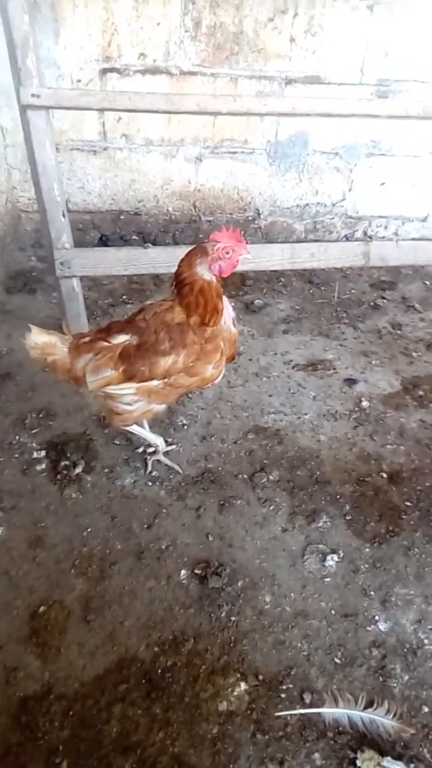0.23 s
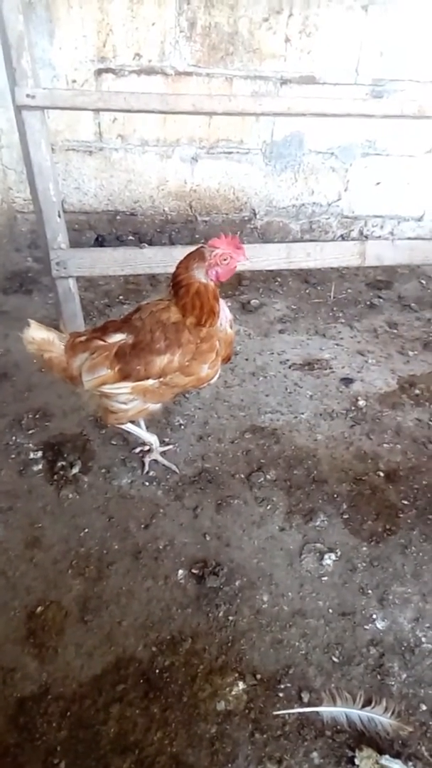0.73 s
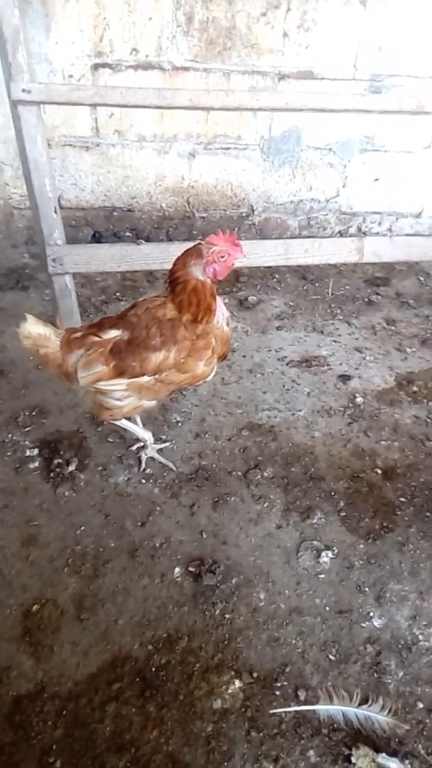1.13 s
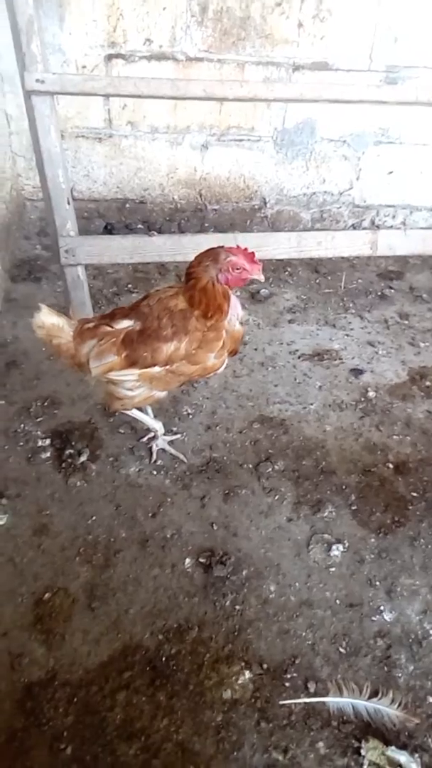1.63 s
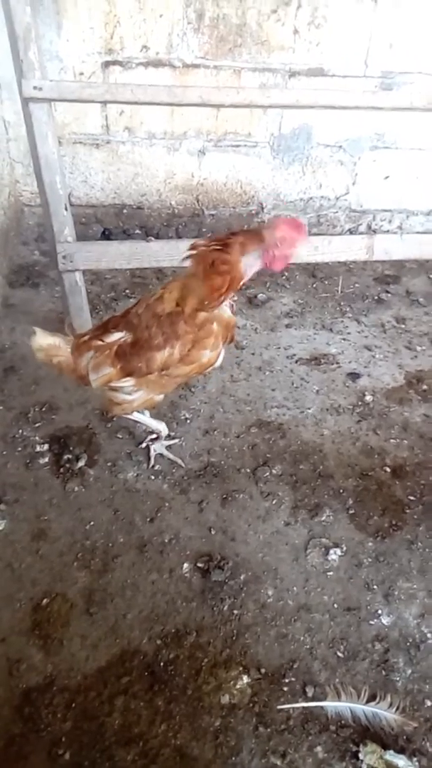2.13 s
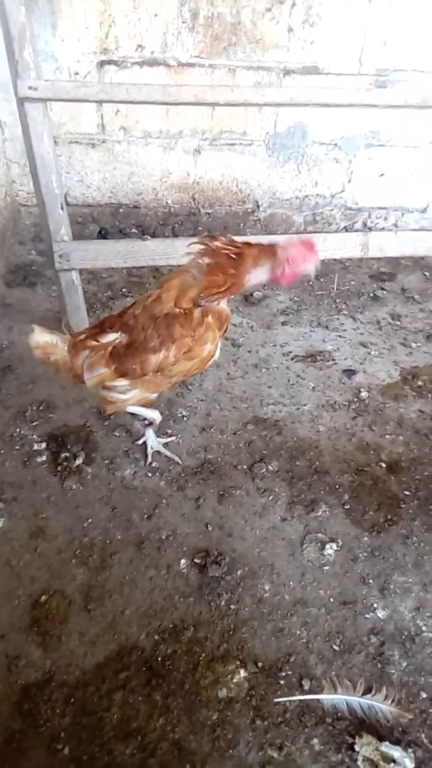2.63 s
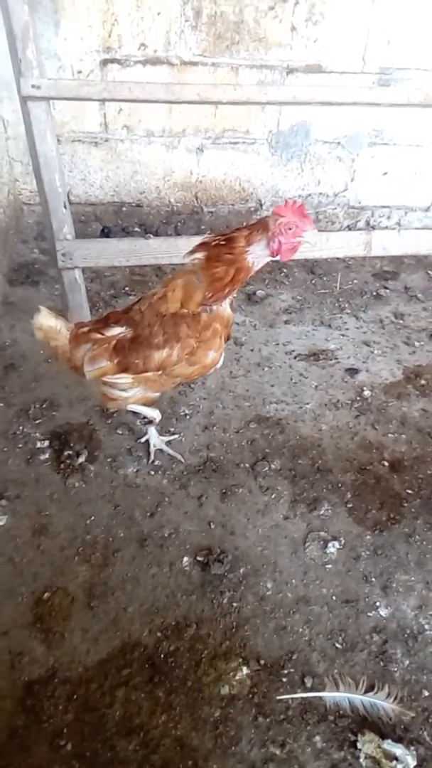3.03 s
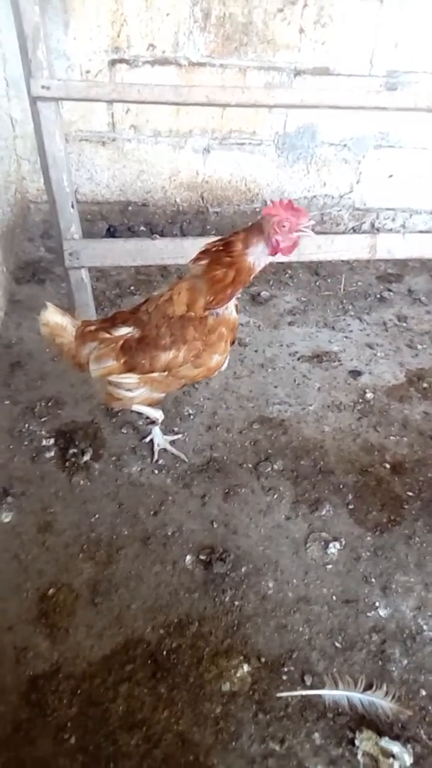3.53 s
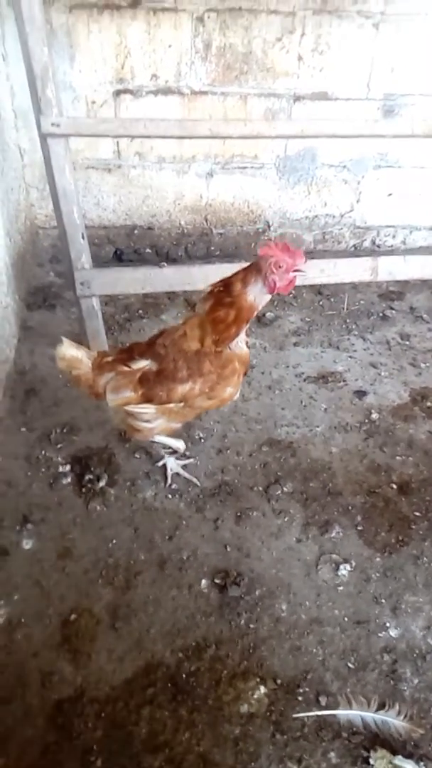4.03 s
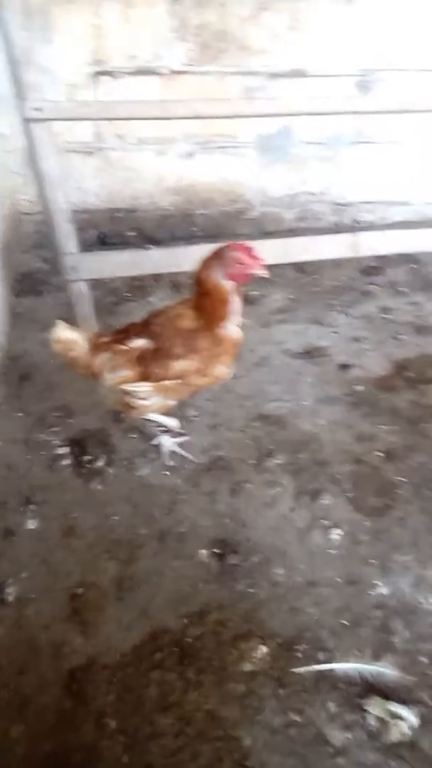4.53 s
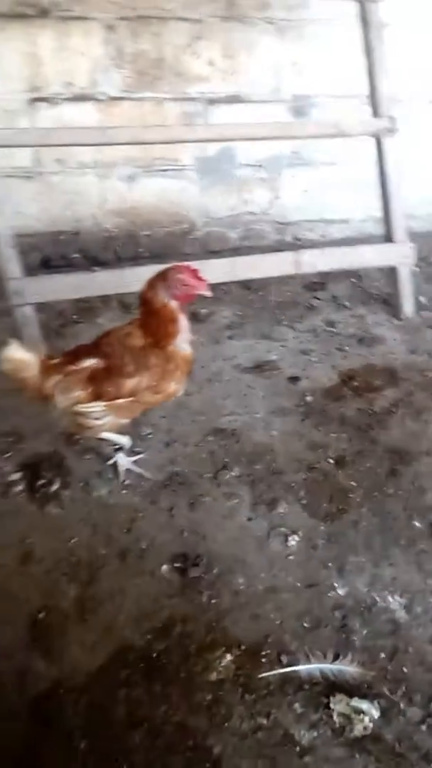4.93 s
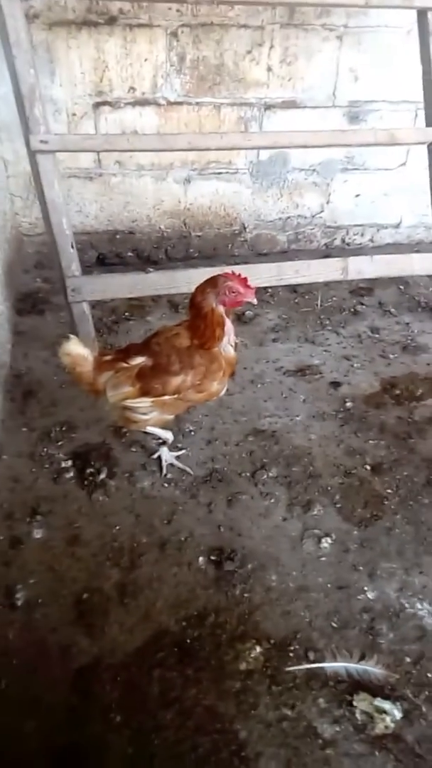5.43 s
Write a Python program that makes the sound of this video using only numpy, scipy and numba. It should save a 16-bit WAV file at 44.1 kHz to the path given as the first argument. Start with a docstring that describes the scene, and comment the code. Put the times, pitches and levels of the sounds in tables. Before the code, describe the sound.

One hen near the microphone gives a single harsh squawk, just under a second long, its pitch cracking up and down. Before it, hens further back cluck and moan quietly; after it come scattered pecks and scrapes, then another climbing moan and a couple of clucks. A low hum, airy hiss and faint twittering sparrows fill the small, slightly echoing pen throughout.

```python
"""A walled hen pen opens on hum, air hiss and sparrows twittering outside; feet and beaks tap throughout.
Further off the flock clucks, and a long throaty moan rises from 1 s. At 1.8 s a near hen stretches her
neck and gives one harsh squawk: her voice membranes break from register to register, rasping as they go,
and the stone walls ring. From 2.7 s the pen is back to taps and murmur, until a second moan climbs
at 4.7 s and two clucks close the scene."""
import sys
import numpy as np
from scipy import signal
from scipy.fft import rfft, irfft, next_fast_len
from scipy.io import wavfile
from scipy.ndimage import uniform_filter1d
from numba import njit

SR = 44100
rng = np.random.default_rng(int(sys.argv[2]) if len(sys.argv) > 2 else 0)


def dump_mix(stems):
    """Bounce the given channels to the path in sys.argv[1] as a 16-bit WAV at rate SR."""
    frames = np.atleast_2d(stems).T  # one column per channel
    limited = np.clip(frames, -1, 1)  # hard clip at full scale
    pcm = np.round(limited * 32767).astype(np.int16)
    wavfile.write(sys.argv[1], SR, pcm)


N = 250488
TIME, FFT_SIZE = np.arange(N) / SR, next_fast_len(N)
TOP_HZ = 15680

# Squawk registers, levels relative to the effort: start/s, end/s, from f/Hz, to f/Hz, glide/s,
# first partial/dB, its swell/dB, second partial/dB, its swell/dB, overtones/dB, tilt/(dB per octave),
# half-pitch partials/dB, rasp/dB, extra rasp at the break/dB, jitter/share of pitch
REGISTERS = [(1.82, 1.894, 858, 1403, .015, 0.5, 6.5, -4, 15, -8, -1, -47, -17.5, 23, 0.0042),
             (1.882, 2.057, 1370, 1227, 0.099, -0.5, -2.5, -13.5, -11, -8, 0.5, -12, -6, -3.5, 0.098),
             (2.014, 2.183, 610, 717.7, .06, -1, 9.5, -8, -14, -6, 4.5, -49, -31, 23, 0.0036),
             (2.17, 2.266, 709, 747, 0.082, -7.5, 17.5, -11.5, -23, -4, 1, -4, -6.5, 4, 0.01),
             (2.253, 2.296, 749, 840, 0.0306, 2.5, -15.5, -19, -1, -18, 13, 8, -3.5, 4.5, 0.012),
             (2.289, 2.394, 976.6, 1017, 0.049, -7, -2, -1, -2, -8.5, 5, -20.5, -7.5, 2, 0.0172),
             (2.381, 2.564, 1100, 1139, 0.034, 2, 2.5, -7, -12.5, -16.5, 6, -6, -4.5, 10.5, 0.0163),
             (2.551, 2.648, 1115, 1141, 0.051, -13, -14, -10.5, -19, -8.5, 0, 6, 0, 0, 0.024)]
# Effort envelope of the squawk: t/s, level/dB
EFFORT = [(1.818, -15), (1.836, -20), (1.844, -20.5), (1.856, -11.5), (1.872, -18), (1.908, -20),
          (1.95, -26), (1.974, -31.5), (2.048, -16.5), (2.246, -19), (2.278, -16), (2.304, -22.5),
          (2.34, -14), (2.404, -18.5), (2.536, -14), (2.574, -21.5), (2.594, -13), (2.64, -25.5)]
# The near hen's open throat, as an EQ on her overtones: f/Hz, gain/dB
OPEN_THROAT = [(290, -13), (500, -19), (694, 10.5), (1610, 7.5), (2020, 1), (2460, -18), (2800, -4.5),
               (3180, -7.5), (3460, -3.5), (5860, -11), (7790, -27), (9120, -26), (15000, -58.5)]
# Resonances rung by chaotic cycles: f/Hz, width/Hz, gain/dB
RASP_MODES = [(919, 254, -11), (1146, 120, -4.5), (1718, 71, -12), (1963, 95, -9.5), (2350, 490, -16),
              (2656, 66, -11), (3797, 250, -13.5), (4573, 323, -14), (5520, 110, -23), (6130, 160, -22),
              (7510, 280, -28.5), (9100, 820, -44.5)]
# The other side of the voice box, humming under the last registers: t/s, f/Hz, level/dB
UNDERTONE = [(2.29, 767, -39), (2.41, 797, -30.5), (2.57, 805, -29.5), (2.615, 639, -29.5),
             (2.66, 603, -28)]
# Two long moans, a list each: t/s, f/Hz, level/dB, brightness/(dB per octave), boost above partial 2/dB
MOANS = [
    [(0.99, 491, -52.5, 8, -8), (1.08, 504.5, -32, 8, -12.5), (1.16, 568.5, -32, -3, -3),
     (1.25, 593.2, -32, -5, -10), (1.4, 605.4, -27, 0, -12), (1.49, 617.4, -31.5, 1, -17),
     (1.57, 638.3, -25.5, 4, -4), (1.66, 623.5, -25.5, 0.5, -4), (1.73, 603.8, -23.5, 2.5, 2),
     (1.83, 607, -29.5, -2, -4), (1.91, 603.4, -26, 11.5, -5), (1.96, 521.6, -28.5, 1, 16),
     (2.04, 510, -27.5, -2.5, 5)],
    [(4.68, 549.3, -50, -1, 11), (4.76, 548.4, -41, 10.5, -19), (4.94, 577.5, -44, 3.5, -18),
     (5.0, 584.6, -34.5, -2.5, -16), (5.07, 651.4, -42.5, -23, 0), (5.17, 728, -30.5, -25, 0),
     (5.23, 834, -31.5, -3, -2), (5.32, 839, -32.5, -4.5, 0), (5.36, 802, -51, 6, 0)],
]
# Short clucks: start/s, length/s, from f/Hz, to f/Hz, level/dB, fade/dB, brightness/(dB per octave),
# boost above partial 2/dB, flutter/share of pitch
CLUCKS = [(0.33, 0.079, 555.6, 562, -36, 15.5, 2.5, 5.5, 0.016),
          (0.869, 0.12, 270.6, 271, -31.5, 6, -8, 16.5, 0.014),
          (1.129, 0.17, 402, 378, -41.5, 5, -0.5, -6, 0.029),
          (1.363, 0.074, 929, 936, -31, 12, -25, 0, 0.045),
          (5.509, .08, 557, 599, -39, 11.5, 7.5, -26, 0.034),
          (5.537, .16, 818.4, 759, -35.5, -1, -9, 11, 0.043)]
# Throat colour of the flock: f/Hz, gain/dB
FLOCK_THROAT = [(270, -24.5), (500, -1.5), (800, -1), (1100, -1.5), (1300, -2.5), (1700, -14.5),
                (2200, -32), (3500, -54)]
# Taps and scrapes of feet and beaks: t/s, level before the crack/dB, f/Hz, width/share of f, t60/s
TAPS = [(0.601, -46.5, 2180, 0.84, 0.2), (0.655, -43.5, 4200, 0.22, 0.11), (1.73, -47.5, 7700, 1, 0.16),
        (3.286, -50.5, 1780, 0.12, 0.83), (3.32, -44, 4230, 0.16, 0.51), (3.62, -41, 5030, 0.095, .16),
        (3.81, -46, 585, .99, 0.36), (4.087, -39, 4520, 0.81, 0.45), (4.49, -47.5, 326, 0.44, 0.23),
        (4.593, -46, 1680, 0.13, 0.3), (4.92, -50.5, 300, .42, 0.82), (5.184, -36, 1860, 0.51, 0.32),
        (5.294, -38, 405, 1, 0.2), (5.44, -53, 2750, 0.12, .078)]
# Path of the twittering band: t/s, centre f/Hz, level/dB
TWITTER = [(0, 5203, -51), (1.5, 5080, -47.5), (3, 5014, -49.5), (3.6, 5000, -48.5), (3.95, 5014, -52.5),
           (4.4, 4760, -45.5), (4.75, 4745, -50), (5.68, 4765, -51)]
# Colour of the hum and hiss: f/Hz, relative level/dB
AIR_COLOUR = [(15, -60), (25, -12), (75, -11.5), (107, 3.5), (160, -6), (399, -9), (433, -14.5), (648, -5),
              (1200, -13.5), (1570, -11), (2920, -10), (5140, -7.5), (6050, -19), (10600, -21.5),
              (15500, -34.5)]
# Steady peaks and dips in the hiss: f/Hz, width/Hz, gain/dB
AIR_BANDS = [(620, 40, 3), (1644, 350, 4.5), (2360, 360, -7.5), (2410, 230, 5), (2690, 65, 5),
             (3760, 220, 3), (6540, 360, 6), (8950, 990, 4), (10600, 580, 6.5)]
# Rustling of the flock, riding the mids of the hiss: t/s, relative level/dB
BUSTLE = [(0, -52), (.5, -56.5), (.85, -52), (3, -56), (3.3, -53.5), (3.85, -57.5), (4.5, -53),
          (5.4, -57.5)]


def squawk(shimmer_db=5.0, hoarse_share=0.87, hoarse_jitter=0.6, hoarse_dulling=0.18):
    """Membrane partials through the open throat; alternating cycles add half lines, chaos adds rasp."""
    out, wobble = np.zeros(N), walk(250)
    chaos = rng.standard_normal(N) * undb(1.5 * walk(400))
    rasp = unit(sum(undb(db) * np.sqrt(width) * unit(ring(chaos, hz, width))
                    for hz, width, db in RASP_MODES))
    shimmer = [undb(shimmer_db * walk(120)) for _ in range(6)]
    order = np.setdiff1d(np.arange(1, 46) / 2, [1, 2])[:, None]  # half steps, without partials 1 and 2
    for (start, end, from_hz, to_hz, glide_s, first_db, swell_db, second_db, swell2_db,
         over_db, tilt, half_db, rasp_db, break_db, shake) in REGISTERS:
        at, gate, (along,) = automation([(start, -.5), (end, .5)], edge_s=.012)
        age = TIME[at] - start
        hz = to_hz + (from_hz - to_hz) * np.exp(-age / glide_s)
        # hoarseness at the break drives rasp, jitter and dullness, then dies away
        hoarse_db = break_db * np.exp(-age / (hoarse_share * glide_s))
        jitter = shake * undb(hoarse_jitter * hoarse_db)
        # the throat holds the two lowest partials steady while the overtones shake
        steady = phase_of(hz * (1 + (0.0024 + 0.2 * jitter) * wobble[at]))
        shaky = phase_of(hz * (1 + jitter * wobble[at]))
        first = undb(first_db + swell_db * along) * np.sin(steady)
        second = undb(second_db + swell2_db * along) * np.sqrt(shimmer[1][at]) * np.sin(2 * steady)
        tilt_db = (tilt - hoarse_dulling * hoarse_db) * np.log2(order)
        gain = undb(eq(OPEN_THROAT, order * hz) + tilt_db + (order % 1 > 0) * half_db)
        gain *= order * hz < TOP_HZ
        gain /= np.sqrt(np.sum(gain ** 2, axis=0))
        overtones = sum(gain[k] * shimmer[k % 6][at] * np.sin(ratio * shaky + k * k)
                        for k, ratio in enumerate(order))
        tone = np.sqrt(2) * (first + second + undb(over_db) * overtones)
        out[at] += gate * (tone + undb(rasp_db + hoarse_db) * rasp[at])
    out *= undb(np.interp(TIME, *np.transpose(EFFORT)))
    at, gate, (hz, db) = automation(UNDERTONE, edge_s=0.011)
    undertone = np.sin(phase_of(hz * (1 + 0.025 * wobble[at])))
    out[at] += np.sqrt(2) * gate * undb(db) * shimmer[0][at] * undertone
    # a small bird radiates no bass
    return signal.sosfilt(signal.butter(4, 430, "high", fs=SR, output="sos"), out)


def flock(throb_hz=38, throb_db=2.5, husk_db=-15, moan_flutter=0.0116):
    """Throaty four-partial calls: pitch flutters, level throbs, uneven cycles add a husky edge."""
    out, order = np.zeros(N), np.arange(1, 5)[:, None]
    throb = 1.03 * walk(60) + np.sin(phase_of(throb_hz * (1 + 0.153 * walk(8))))
    flutter, waver = walk(110), 0.00692 * walk(28)
    husk = np.array([(1 + undb(husk_db) * walk(500)) * undb(1.58 * walk(25)) for _ in order])
    for call, depth in [(moan, moan_flutter) for moan in MOANS] + [cluck(*row) for row in CLUCKS]:
        at, gate, (hz, db, bright, upper_db) = automation(call, edge_s=0.0081)
        phase = phase_of(hz * (1 + depth * flutter[at] + waver[at]))
        gain = undb(eq(FLOCK_THROAT, order * hz) + bright * np.log2(order) + (order > 2) * upper_db)
        gain /= np.sqrt(np.sum(gain ** 2, axis=0))
        tone = np.sum(gain * husk[:, at] * np.sin(order * phase), axis=0)
        out[at] += np.sqrt(2) * gate * undb(db + throb_db * throb[at]) * tone
    return out


def cluck(start, length, hz, to_hz, db, fade_db, bright, upper_db, flutter):
    """Breakpoints and flutter depth of a cluck, which glides straight to its last pitch and level."""
    return [(start, hz, db, bright, upper_db),
            (start + length, to_hz, db - fade_db, bright, upper_db)], flutter


def taps(crack_db=4.5, crack_s=0.0027, pecks_per_s=9):
    """Feet and beaks: dying bursts of band noise that open with a crack; faint pecks fall at random."""
    out, t = np.zeros(N), TIME[:int(.4 * SR)]
    pecks = [(when * N / SR, -56 + 12.5 * size, 1500 * 4.5 ** pitch, .3, .05 + 0.18 * decay)
             for when, size, pitch, decay in rng.random((int(pecks_per_s * N / SR), 4))]
    for start, db, hz, share, t60 in TAPS + pecks:
        burst = unit(ring(rng.standard_normal(len(t)), hz, share * hz))
        envelope = undb(db - 60 * t / t60 + crack_db * np.exp(-t / crack_s))
        place(out, envelope * burst, start)
    return out


def sparrows(chirps_per_s=90, chirp_s=0.016, spread=0.089):
    """Many short falling chirps, blurred by distance and echoes into a twittering band."""
    times, centre_hz, db = np.transpose(TWITTER)
    out, t = np.zeros(N), TIME[:int(.08 * SR)]
    for when, pitch, size, fall in rng.random((int(chirps_per_s * N / SR), 4)):
        start = when * N / SR
        hz = np.interp(start, times, centre_hz) * (1 + spread * (1 - 2.2 * pitch ** 2))
        chirp = np.sin(2 * np.pi * hz * t * (1 - fall * t))
        place(out, undb(12 * size) * chirp * t * np.exp(-t / chirp_s), start)
    chirps = unit(.5 * out + pen_reverb(out))
    blur = unit(ring(rng.standard_normal(N), np.interp(TIME, times, centre_hz), width_hz=910))
    return (undb(-4) * chirps + undb(-5) * blur) * undb(np.interp(TIME, times, db))


def murmur(level_db=-61, clucks_per_s=45, cluck_s=.011):
    """A bed of distant hens: tiny two-partial clucks at random pitches and times."""
    out, t = np.zeros(N), TIME[:int(.15 * SR)]
    for when, pitch, size, glide in rng.random((int(clucks_per_s * N / SR), 4)):
        phase = 2 * np.pi * 300 * 3.0 ** pitch * t * (1 + 0.9 * (glide - .5) * t)
        tone = np.sin(phase) + .6 * np.sin(2 * phase)
        place(out, undb(14 * size) * tone * t * np.exp(-t / cluck_s), when * N / SR)
    return undb(level_db) * unit(out)


def air(level_db=-50):
    """Hum and hiss in flickering half-octave bands; the mids swell with the flock's rustling."""
    hz = np.fft.rfftfreq(FFT_SIZE, 1 / SR)
    bands_db = sum(db * np.exp(-(2 * (hz - centre) / width) ** 2) for centre, width, db in AIR_BANDS)
    spectrum = rfft(rng.standard_normal(FFT_SIZE)) * undb(eq(AIR_COLOUR, hz) + bands_db)
    spectrum /= np.std(irfft(spectrum, FFT_SIZE))
    swell_db = np.interp(TIME, *np.transpose(BUSTLE))
    out, octave = np.zeros(N), np.log2(np.maximum(hz, 20) / 20)
    for centre in np.arange(0, 10.1, .5):
        band = irfft(spectrum * np.clip(1 - 2 * abs(octave - centre), 0, 1), FFT_SIZE)[:N]
        mids = np.exp(-((centre - 6.3) / 1.8) ** 2)  # strongest near 1.6 kHz
        out += band * undb(mids * (swell_db - swell_db.mean() + 2.0 * walk(25)) + walk(8))
    return out * undb(level_db)


def pen_reverb(x, t60_s=.3, treble_t60_s=0.17, predelay_s=0.0068):
    """Dense echoes from the stone walls, the treble dying first."""
    t = TIME[:int(.7 * SR)]
    echo = rng.standard_normal(len(t))
    low = signal.sosfilt(signal.butter(1, 1800, fs=SR, output="sos"), echo)
    tail = low * undb(-60 * t / t60_s) + (echo - low) * undb(-60 * t / treble_t60_s)
    tail *= np.clip(t / predelay_s - 1, 0, 1)
    return signal.fftconvolve(x, tail / np.sqrt(np.sum(tail ** 2)))[:N]


def undb(db):
    """Gain of a level in dB."""
    return 10 ** (np.asarray(db) / 20)


def unit(x):
    """Scale to rms 1."""
    return x / np.sqrt(np.mean(x ** 2))


def phase_of(hz):
    """Running phase of a moving pitch."""
    return 2 * np.pi * np.cumsum(hz) / SR


def place(track, sound, start_s):
    """Mix a sound in, trimmed to the end of the track."""
    at = int(start_s * SR)
    track[at:at + len(sound)] += sound[:N - at]


def walk(rate_hz):
    """Random modulator: sample and hold, slewed twice, rms 1."""
    hold = max(int(SR / rate_hz), 1)
    steps = np.repeat(rng.standard_normal(N // hold + 1), hold)
    return unit(uniform_filter1d(uniform_filter1d(steps, hold), hold)[:N])


def eq(table, hz):
    """Read an EQ curve in dB on a log-frequency axis."""
    points_hz, db = np.transpose(table)
    return np.interp(np.log(np.maximum(hz, 1)), np.log(points_hz), db)


def automation(call, edge_s):
    """Sample range, soft gate and parameter curves from a call's breakpoints."""
    times, *columns = np.transpose(call)
    at = slice(int(times[0] * SR), min(int(times[-1] * SR), N))
    t = TIME[at]
    gate = np.clip(np.minimum(t - times[0], times[-1] - t) / edge_s, 0, 1)
    return at, gate, [np.interp(t, times, column) for column in columns]


@njit
def bandpass(x, hz, width_hz):
    """State-variable band-pass with a moving centre, gain 1 at the centre."""
    y, band, low = np.empty(len(x)), 0., 0.
    for i in range(len(x)):
        g, damping = np.tan(np.pi * hz[i] / SR), width_hz / hz[i]
        v = (band + g * (x[i] - low)) / (1 + g * (g + damping))
        band, low, y[i] = 2 * v - band, low + 2 * g * v, damping * v
    return y


def ring(x, hz, width_hz):
    """A steep resonance: the band-pass twice."""
    hz, width_hz = hz + np.zeros(len(x)), float(width_hz)
    return bandpass(bandpass(x, hz, width_hz), hz, width_hz)


def scene(near_send_db=-4, far_send_db=-5.5):
    """The near hen up front, the flock behind; both ring the pen, over taps, sparrows and air."""
    near = undb(-2.0) * squawk()
    far = flock() + murmur()
    wet = pen_reverb(undb(near_send_db) * near + undb(far_send_db) * far)
    return (near + far + wet + taps() + sparrows() + air())[None]


def record(dry):
    """A soft limiter rounds the squawk's loudest peaks, a bit lopsided; filters trim both extremes."""
    bent = np.tanh(.5 * dry) / .5 + 0.036 * dry ** 2
    bent = signal.sosfilt(signal.butter(1, 15, "high", fs=SR, output="sos"), bent)
    return signal.sosfilt(signal.ellip(12, .2, 70, TOP_HZ, fs=SR, output="sos"), bent)


dry = scene()
out = record(dry)
dump_mix(out)
```